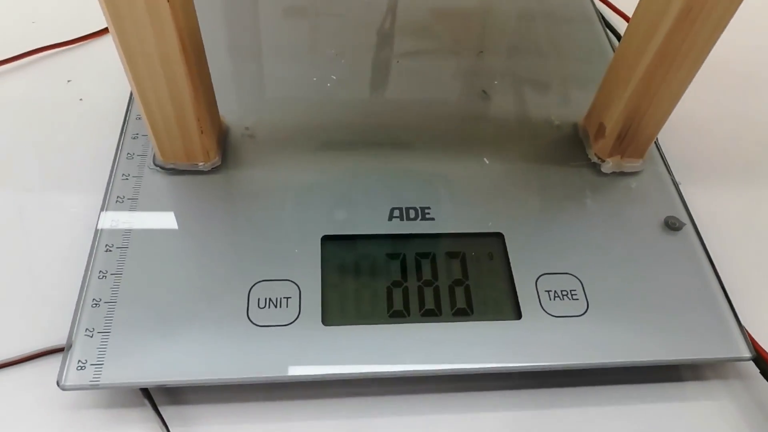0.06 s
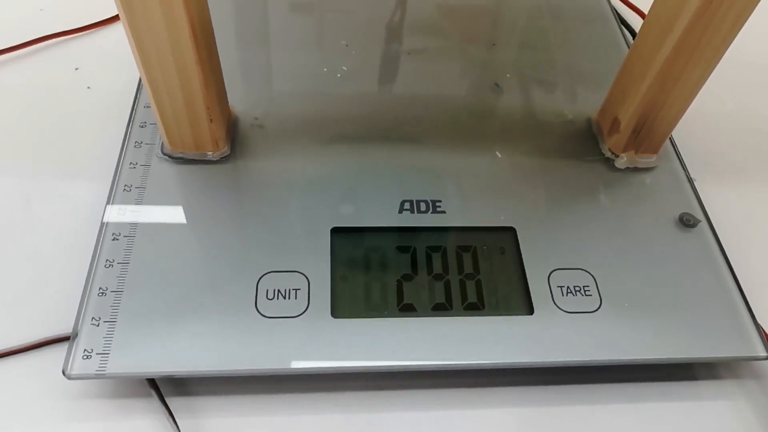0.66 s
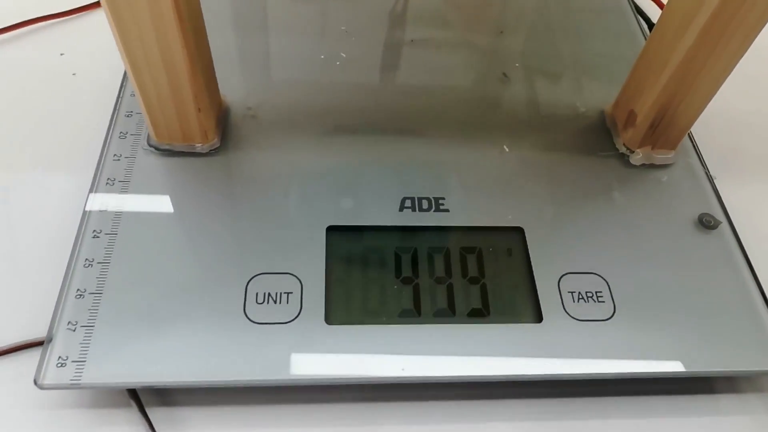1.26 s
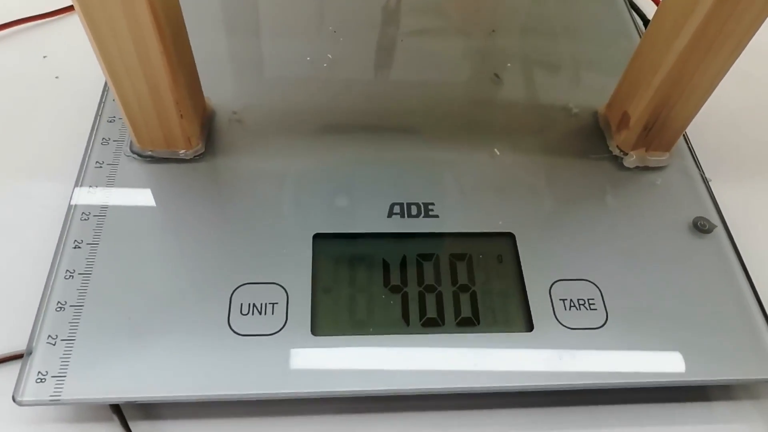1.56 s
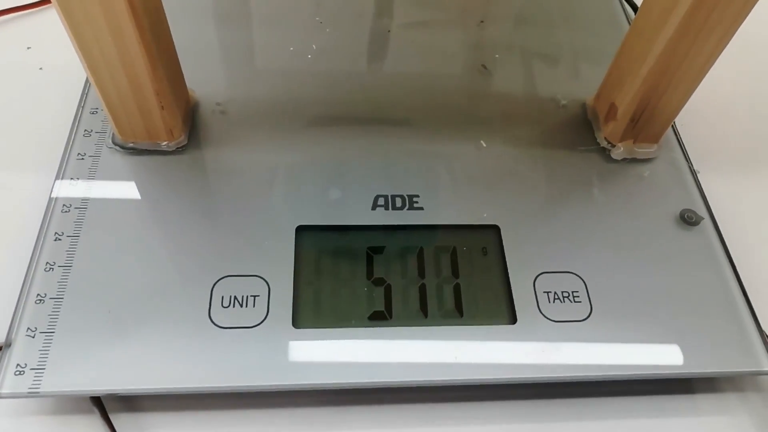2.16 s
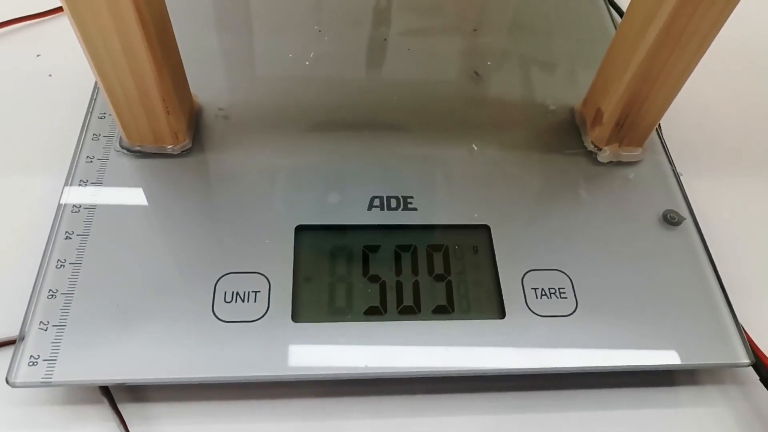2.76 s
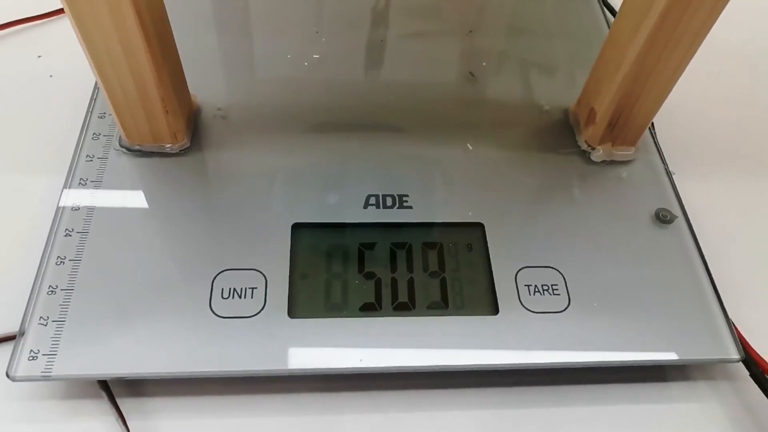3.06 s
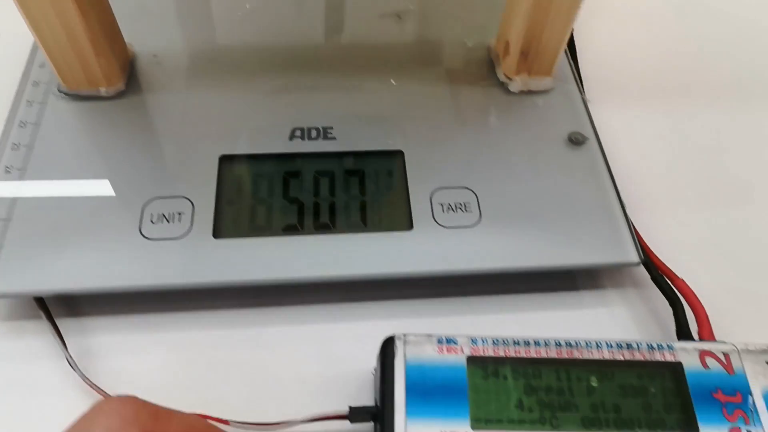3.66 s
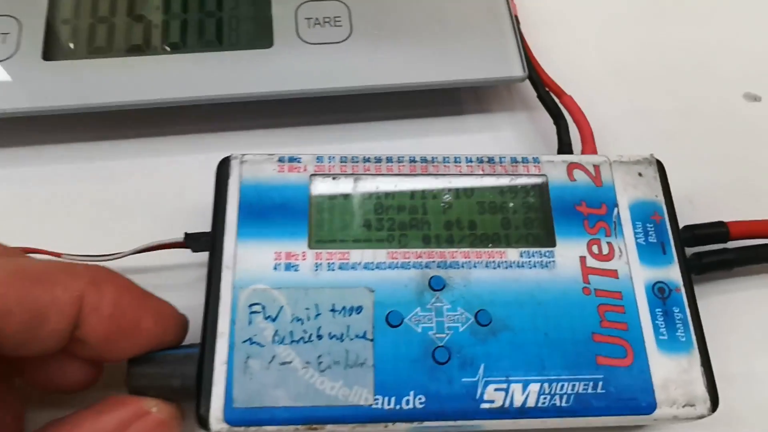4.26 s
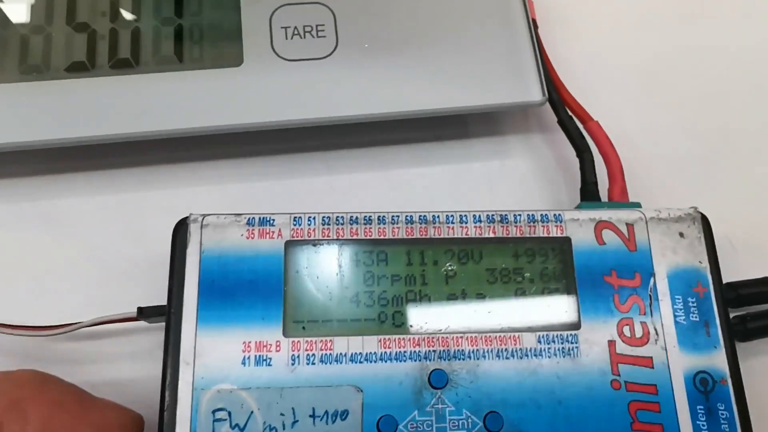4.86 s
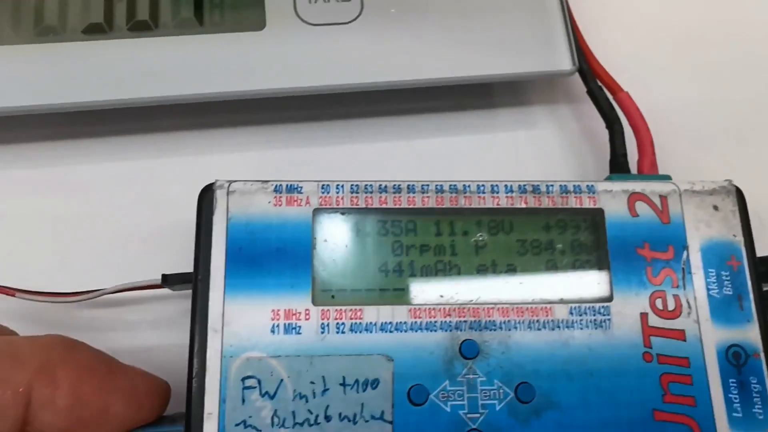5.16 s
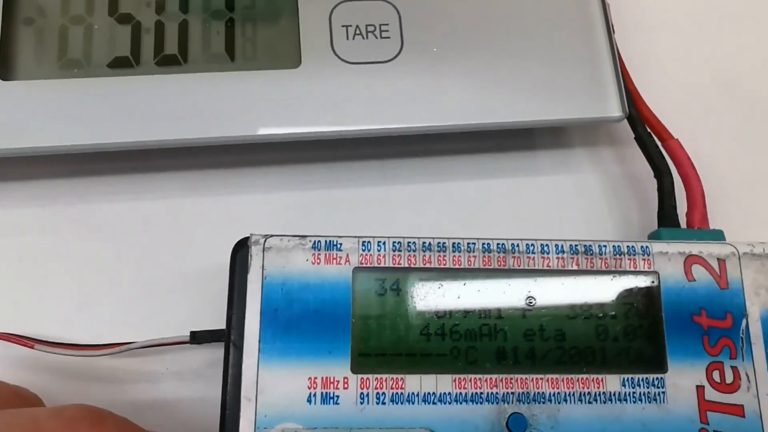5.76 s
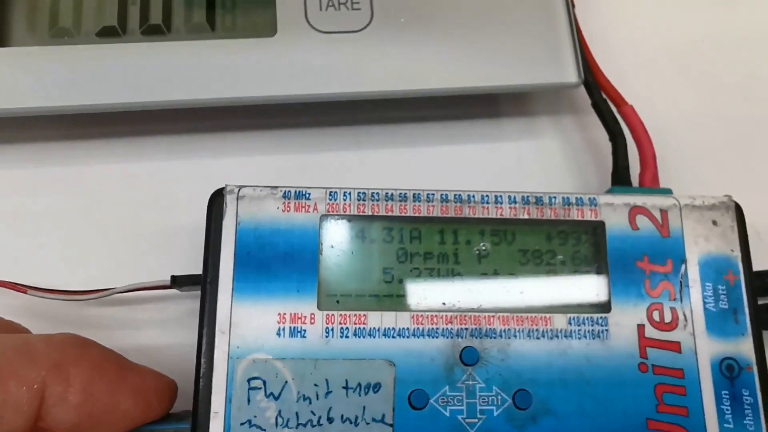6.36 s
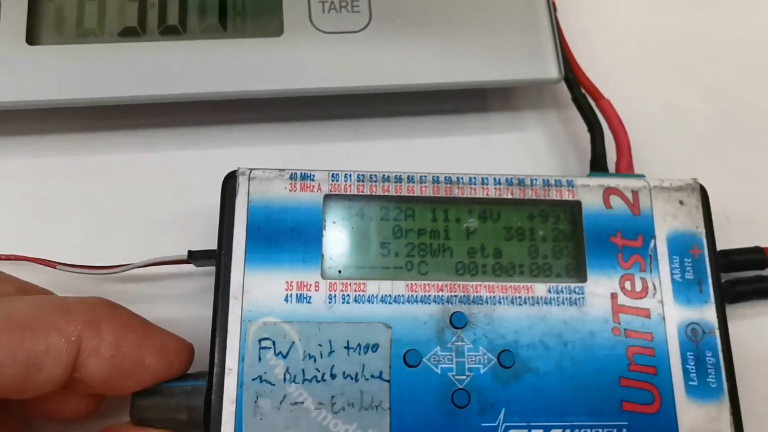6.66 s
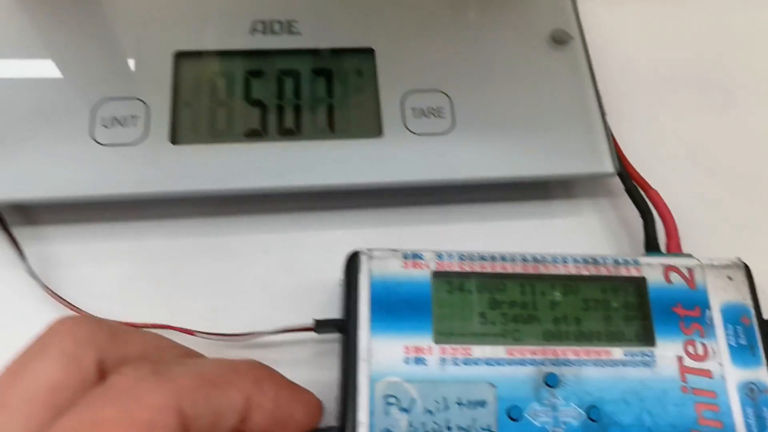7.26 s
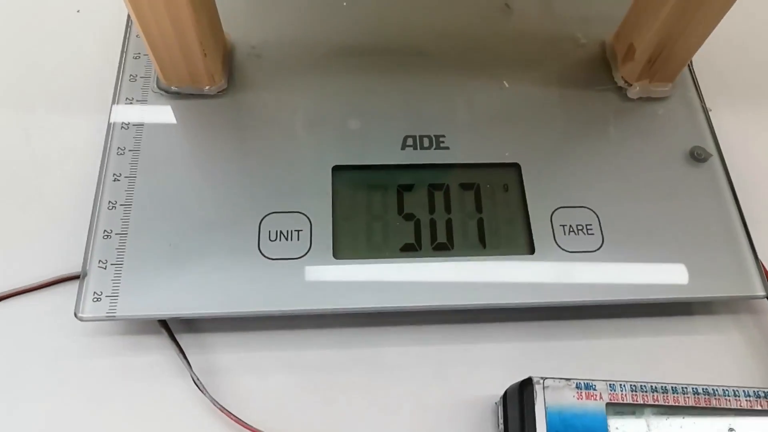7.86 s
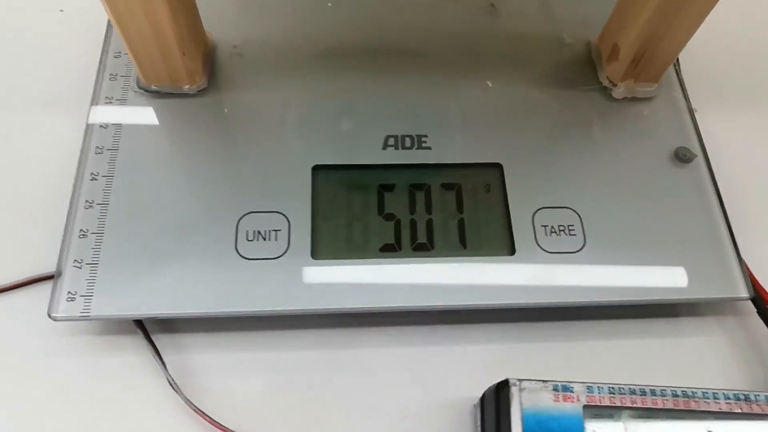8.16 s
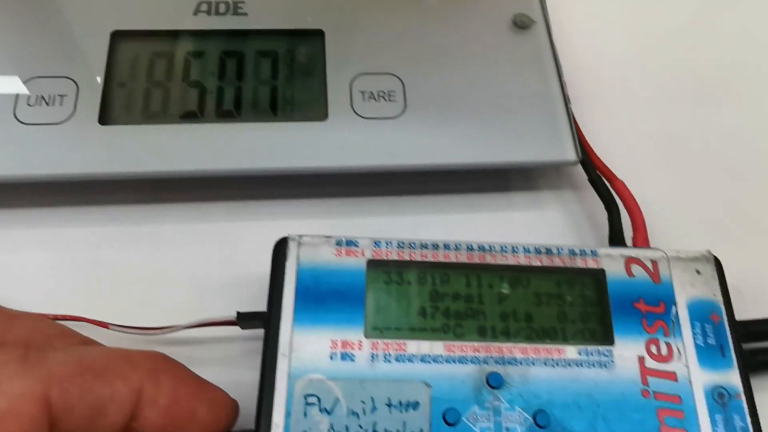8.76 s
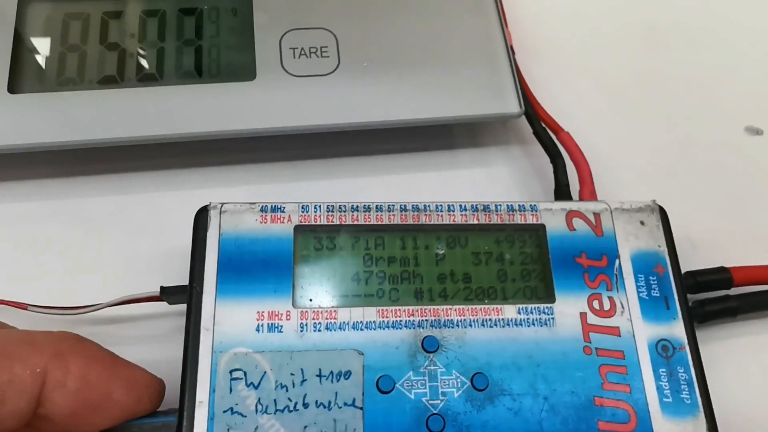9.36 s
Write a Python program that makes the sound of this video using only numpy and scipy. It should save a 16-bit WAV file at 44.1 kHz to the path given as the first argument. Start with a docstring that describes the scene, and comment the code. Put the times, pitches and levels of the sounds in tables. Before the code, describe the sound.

A small electric ducted fan is already running on a test stand, whining over rushing air. Almost at once its pitch climbs, reaching full speed in under two seconds. It then holds a high whine with a hum beneath and a bright hiss, sagging very slightly in pitch. The tones swell and fade as a close hand-held stereo microphone moves about indoors, with faint air buffeting on the left.

```python
"""A whine climbs over rushing air: a small twelve-bladed electric ducted fan on a test stand spools up
to full throttle and holds, sagging as the battery drains. Its rotor hums at the shaft rate, the blades
whine in turbulent inflow, and the jet rushes. The tones swell and fade as a hand-held stereo microphone
moves through the standing waves of the room; stray air brushes its left port."""
import sys
import numpy as np
from scipy.fft import rfft, irfft, next_fast_len
from scipy.io import wavfile
from scipy.ndimage import map_coordinates

SR = 44100
rng = np.random.default_rng(int(sys.argv[2]) if len(sys.argv) > 2 else 0)


def output_pcm(signal):
    """Save a mono or channel-first signal as 16-bit PCM at the path in sys.argv[1].

    Samples are clipped to [-1, 1] before scaling.
    """
    pcm = np.clip(np.atleast_2d(signal).T, -1, 1) * 32767
    wavfile.write(sys.argv[1], SR, np.round(pcm).astype(np.int16))


N = 418950

# Gain on all the rushing noise: louder at first, then ducking and holding level.
# Each row: time in seconds, gain in dB.
NOISE_GAIN = [(0, 2.5), (.33, 4), (.68, -1.4), (1.1, -0.7), (1.45, .8), (4.2, 0.15), (4.6, -0.26),
              (6.2, .5), (6.8, -0.35), (8.3, -0.5), (9.5, -0.8)]
# The microphone's path. Each row: time in seconds, place (1 by the foot of the stand, 0 drawn back).
MIC_PLACE = [(0, 0.65), (1.6, 0.84), (3.4, 0.93), (4, 0.14), (7.2, 0.16), (7.65, 1), (8.35, 0.96),
             (8.65, 0.59), (9.5, 0.14)]


def amp(db):
    """Decibels to gain."""
    return 10 ** (np.asarray(db) / 20)


def unit(x):
    """Scale to rms 1."""
    return x / np.sqrt(np.mean(np.abs(x) ** 2) + 1e-20)


def curves(rows):
    """One value per sample for each column after the time."""
    s, *cols = np.transpose(rows)
    return np.array([np.interp(np.arange(N) / SR, s, c) for c in cols])


def along(rows, hz):
    """Each column after the frequency, read on a log axis."""
    f, *cols = np.transpose(rows)
    return np.array([np.interp(np.log(hz + 1), np.log(f + 1), c) for c in cols])


def swells(rows):
    """Gain at each port, joined as pressure: standing waves have broad crests and sharp nulls."""
    s, *cols = np.transpose(rows)
    return np.array([np.interp(np.arange(N) / SR, s, amp(db)) for db in cols])


def swell_at(s, length):
    """A soft rise and fall centred on time s."""
    return np.exp(-(2 * (np.arange(N) / SR - s) / length) ** 2)


def wobble(rate):
    """A smooth random curve, rate knots a second."""
    knots = rng.standard_normal(int(N * rate / SR) + 4)
    return map_coordinates(knots, [np.arange(N) * rate / SR])


def eddies(width_hz, channels):
    """Complex random motion of rms 1 whose spectrum falls away beyond width_hz."""
    m = next_fast_len(N)
    hz = np.fft.fftfreq(m, 1 / SR)
    white = rng.standard_normal((channels, m)) + 1j * rng.standard_normal((channels, m))
    return unit(np.fft.ifft(white / (1 + (hz / width_hz) ** 2))[:, :N])


def ports(lead):
    """Phase at the left and right port when the left leads by so many radians."""
    return np.array([[.5], [-.5]]) * lead


def turbulence(colour):
    """Stereo noise of rms 1, with its own colour at each port, shifting as the microphone moves."""
    # Stereo image. Each row: frequency in Hz, correlation of the two ports.
    likeness = [(60, 0.77), (250, 0.93), (900, 0.56), (1500, -0.55), (2200, -0.59), (4000, 0.025),
                (12000, -0.043)]
    # Reflections at the foot of the stand recolour the air.
    # Each row: frequency in Hz, gain in dB at the foot (as much the other way when drawn back).
    foot_colour = [(850, 0.1), (1200, 2), (1550, 4.5), (1950, -1.5), (2200, -2.5), (2500, -4.5),
                   (2850, 0.7), (3250, -1.7), (4600, 1.2), (6100, 1), (6750, -0.6), (7400, 1.1),
                   (9500, -0.64), (10800, 1.1), (14500, -1.4)]
    m = next_fast_len(N + 8192)
    hz = np.fft.rfftfreq(m, 1 / SR)
    spread = np.arccos(np.clip(along(likeness, hz)[0], -1, 1)) / 2
    mid, side = rfft(rng.standard_normal((2, m))) * [np.cos(spread), np.sin(spread)]
    pair = np.array([mid + side, mid - side]) * amp(along(colour, hz))
    reflection = amp(along(foot_colour, hz))
    near = irfft(pair * reflection, m)[:, :N]
    back = irfft(pair / reflection, m)[:, :N]
    place = np.clip(curves(MIC_PLACE), 0, 1)
    return unit(place * near + (1 - place) * back)


def draught():
    """Stray air buffets the microphone in soft random lumps, with a few stronger puffs."""
    # A low rumble, mostly left. Each row: frequency in Hz, relative left and right levels in dB.
    buffet_colour = [(14.8, -84, -95), (71, -78, -91), (160, -77.5, -97), (340, -83.5, -96),
                     (800, -104, -116)]
    # Each row: centre of a puff in seconds, length in seconds, level in dB.
    puff_cues = [(4.8, .06, -56), (5.728, 0.15, -48), (6.154, 0.06, -55), (6.37, .09, -54),
                 (6.69, .04, -54), (7.934, 0.15, -57), (8.2, 0.19, -57)]
    lumps = amp(-62.5 + 2.5 * wobble(rate=9))
    puffs = sum(amp(db) * swell_at(s, length) for s, length, db in puff_cues)
    return (lumps + puffs) * turbulence(buffet_colour)


def bench_echoes(x, echo_db, count=6):
    """Weak echoes off the bench and walls comb the noise; their paths drift with the hand."""
    n = np.arange(N)
    out = x.copy()
    for port in range(len(x)):
        for delay_s in rng.uniform(.002, .016, count):
            path_s = delay_s + .00007 * wobble(rate=1.5)
            out[port] += amp(echo_db) * np.interp(n - path_s * SR, n, x[port], left=0)
    return out / np.sqrt(1 + count * amp(echo_db) ** 2)


def treble_db(foot_lift_db=3):
    """The treble follows the noise gain and is beamed towards the foot of the stand."""
    return curves(NOISE_GAIN)[0] + foot_lift_db * curves(MIC_PLACE)[0]


def jet(roar_db=-38.5, rush_db=-34.5, hiss_db=-33.1):
    """The exhaust roars, the intake rushes and the blade edges hiss, all surging together."""
    # Three colours of air, dark to bright. Each row: frequency in Hz, relative left and right levels in dB.
    roar_colour = [(50, -87, -100), (150, -84.5, -87.5), (270, -77, -77.5), (357, -78, -79),
                   (454, -82.5, -83.5), (724, -79, -71.5), (843, -85, -86.5), (863, -77, -75.5),
                   (1240, -76, -75), (1424, -74.5, -68), (2313, -69.5, -67.5), (2460, -75, -82),
                   (3550, -88, -94)]
    rush_colour = [(1770, -100, -100), (2740, -74, -79), (3730, -71, -71.5), (4440, -72, -73.5),
                   (4650, -73.5, -71), (5900, -71.5, -73.5), (6700, -70.5, -65.5), (8020, -72, -74.5),
                   (9750, -79, -95), (12000, -105, -105)]
    hiss_colour = [(5660, -100, -100), (6910, -66.5, -64.5), (8400, -84, -80), (9000, -87, -74),
                   (9300, -73, -74), (10470, -98, -67), (10450, -73, -64), (11220, -73, -67),
                   (12700, -76.5, -73.5), (13200, -73, -67.5), (14300, -76, -74), (16000, -71.5, -68.5)]
    gain_db = curves(NOISE_GAIN)[0]
    surge_db = 0.43 * wobble(rate=9)
    roar = amp(roar_db + gain_db + surge_db) * turbulence(roar_colour)
    rush = amp(rush_db + gain_db + surge_db) * turbulence(rush_colour)
    hiss = amp(hiss_db + treble_db() + surge_db) * turbulence(hiss_colour)
    return roar + rush + hiss


def overtones(angle, speed, foot_lift_db=5.5):
    """Faint shaft harmonics grow with speed and waver as the microphone crosses their standing waves."""
    # Weak tones from unequal blades. Each row: multiple of the shaft rate, base level in dB.
    partials = [(4, -54.5), (5, -59), (6, -61), (7, -59.5), (8, -59), (10, -57)]
    fades = 0.69 + 0.82 * eddies(width_hz=5.9, channels=2)
    tones = 0
    for k, db in partials:
        own_fades = np.roll(fades, rng.integers(N), axis=1)
        tones += amp(db) * np.real(own_fades * np.exp(1j * round(k) * angle))
    return tones * (speed / speed.max()) ** 5 * amp(foot_lift_db * curves(MIC_PLACE)[0])


def whistles(angle):
    """A thin whistle stands out where the microphone lingers on the crest of one overtone."""
    # Each row: centre in seconds, length in seconds, multiple of the shaft rate, peak level in dB.
    cues = [(2.08, .55, 7, -47), (8.0, 1.0, 8, -47.5)]
    return sum(amp(db) * swell_at(s, length) * np.cos(round(k) * angle + ports(lead=1))
               for s, length, k, db in cues)


def stand_flare(hz):
    """Gain of a tone as its pitch passes through the resonances of the stand."""
    # Each row: centre in Hz, width in Hz, lift in dB.
    resonances = [(1050, 72, 24), (1690, 55, 10)]
    return amp(sum(db / (1 + (2 * (hz - centre) / width) ** 2) for centre, width, db in resonances))


def rotor(angle, speed):
    """Imbalance hums once a turn; the second harmonic is clean and the third rasps in surges."""
    # The first three shaft harmonics at the moving microphone.
    # Each row: time in seconds, left and right base levels in dB.
    hum_ride = [(1.6, -39.5, -26.5), (2.4, -36.5, -24.5), (3.9, -37.5, -27.5), (5.2, -32.5, -29.5),
                (7.0, -34, -33.5), (8.05, -35.5, -29), (8.8, -34, -36.5), (9.5, -37, -47.5)]
    second_ride = [(1.7, -40.5, -45), (2.7, -44, -69), (3.7, -71, -38), (4.8, -46, -42), (5.6, -46, -44),
                   (6.5, -56, -39.5), (8.5, -44, -44.5), (9.1, -37, -32), (9.5, -41, -34)]
    third_ride = [(.9, -47, -48), (1.27, -40, -37), (1.6, -53, -41), (3.35, -46, -49.5), (4.0, -72, -33.5),
                  (4.9, -60, -38.5), (8.5, -48, -33.5), (9.5, -51, -36)]
    # Standing waves that the rising hum sweeps through. Each row: pitch in Hz, left and right gains in dB.
    standing_waves = [(472, -2.5, -32), (540, -10, -15), (559, -4, -6), (597, 8, -8.5), (602, 0, -19),
                      (646, 4, -5), (670, 9, -8.5), (688, 6.5, -10), (700, -15, 0), (701.7, -0.5, -0.5)]
    throttle = speed / speed.max()
    # The rising pitch shapes the hum's level during spool-up; after that the moving microphone does.
    sweep_db = along(standing_waves, np.maximum.accumulate(speed))
    hum_db = curves(hum_ride) + sweep_db + 0.29 * wobble(rate=18)
    hum = amp(hum_db) * np.cos(angle + ports(lead=0.55))
    # Drawn back, the two ports lie on opposite sides of a standing wave.
    apart = ports(lead=2.6 - 1.4 * curves(MIC_PLACE)[0])
    flicker = amp(0.7 * wobble(rate=12))
    second = swells(second_ride) * throttle ** 7.9 * flicker * np.cos(2 * angle + apart)
    rasp = 1 + 0.5 * amp(4 * wobble(rate=16)) * eddies(width_hz=78, channels=1)
    third = swells(third_ride) * throttle ** 2 * np.real(rasp * np.exp(1j * (3 * angle + apart)))
    return hum + second * stand_flare(2 * speed) + third * stand_flare(3 * speed)


def blades(angle, count=12, skirt_db=-37):
    """The blade-passing whine: eddies drawn into the duct shake its strength and phase."""
    # The whine at the moving microphone. Each row: time in seconds, left and right base levels in dB.
    whine_ride = [(0, -23, -34), (.3, -23, -29), (.47, -33, -31), (.6, -30.5, -22.5), (.95, -39, -27),
                  (1.9, -32, -44), (3.15, -36, -38), (3.5, -33.5, -37), (3.97, -40, -40),
                  (4.22, -39, -28.5), (4.68, -34.5, -42), (5.25, -32.5, -29), (5.92, -32.5, -58),
                  (6.2, -29.5, -30), (7.3, -44, -43), (7.7, -32, -29.5), (8.3, -28.5, -27.5),
                  (8.55, -36, -51), (9.0, -40, -28), (9.5, -33.5, -35)]
    passing = np.exp(1j * count * angle)
    flutter = 0.48 * eddies(width_hz=140, channels=1) + 0.38 * eddies(width_hz=6.3, channels=2)
    # Drawn back, the microphone hears more of the room, and the phase between its ports wanders further.
    wander = 1.1 - 0.18 * curves(MIC_PLACE)[0]
    drift = np.exp(1j * ports(lead=wander * wobble(rate=2.06)))
    # The hand crosses small standing waves, about 1 dB deep.
    fades = amp([wobble(rate=5.5), wobble(rate=5.5)])
    whine = swells(whine_ride) * fades * np.real((1 + flutter) * passing * drift)
    # Small eddies spread a skirt of narrow noise around the whine, in step with the hiss.
    skirt = amp(skirt_db + treble_db()) * np.real(eddies(width_hz=820, channels=2) * passing)
    return whine + skirt


def scene():
    """Tones locked to one slightly trembling shaft, over the jet and the draught."""
    # Spool-up and slow sag. Each row: time in seconds, shaft speed in turns per second.
    shaft_speed = [(0, 471.2), (.29, 472.5), (.35, 488), (.5, 547.5), (.6, 571), (1.0, 637.8),
                   (1.54, 702.5), (1.68, 706.2), (2.9, 700.9), (4.0, 697.2), (5.0, 695), (6.2, 691.6),
                   (6.9, 692.4), (7.95, 691.4), (8.35, 690), (9.5, 689)]
    speed = curves(shaft_speed)[0] + 0.11 * wobble(rate=10)
    angle = 2 * np.pi * np.cumsum(speed) / SR
    tones = rotor(angle, speed) + overtones(angle, speed) + whistles(angle) + blades(angle)
    return tones + bench_echoes(jet(), echo_db=-14.5) + draught()


def record(dry):
    """A brick-wall low-pass trims the very top of the hiss."""
    top_hz = 15780
    m = next_fast_len(N + SR // 2)
    passband = np.fft.rfftfreq(m, 1 / SR) < top_hz
    return irfft(rfft(dry, m) * passband, m)[:, :N]


dry = scene()
out = record(dry)
output_pcm(out)
```